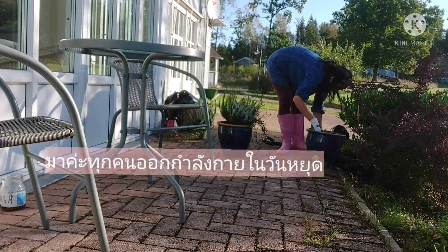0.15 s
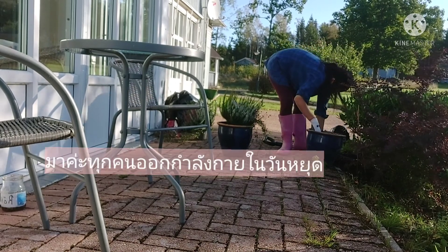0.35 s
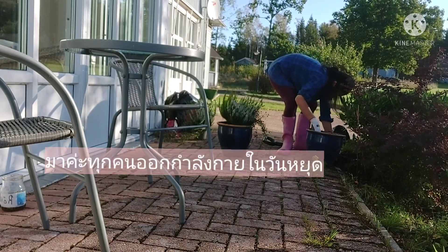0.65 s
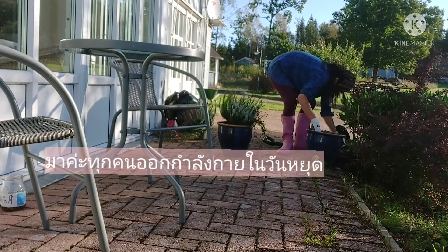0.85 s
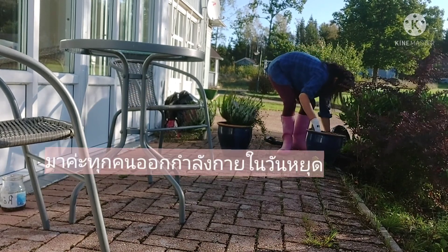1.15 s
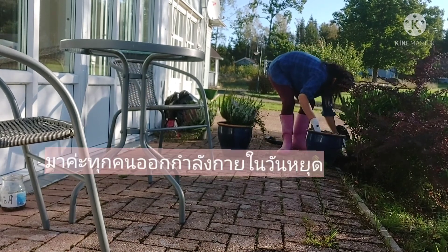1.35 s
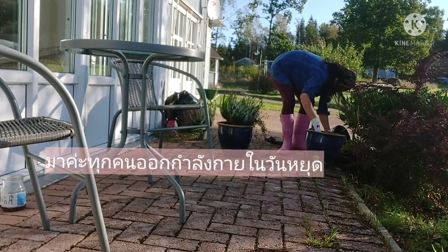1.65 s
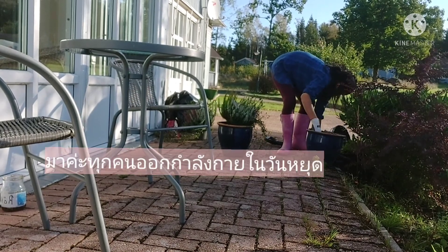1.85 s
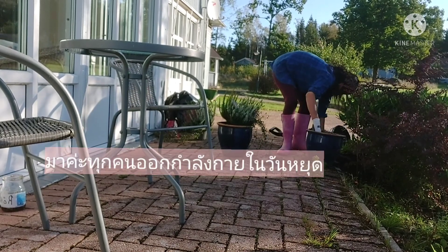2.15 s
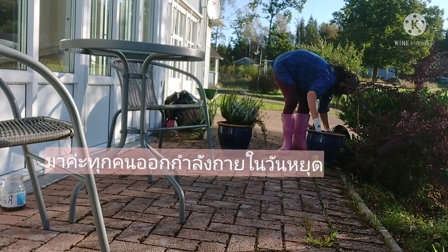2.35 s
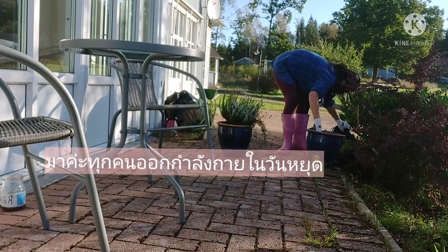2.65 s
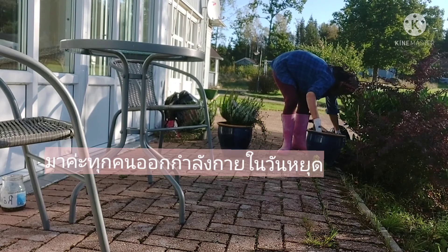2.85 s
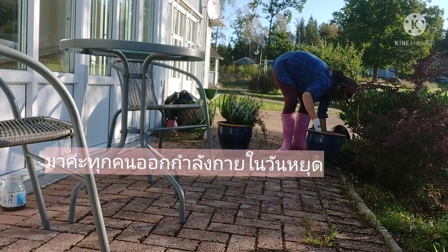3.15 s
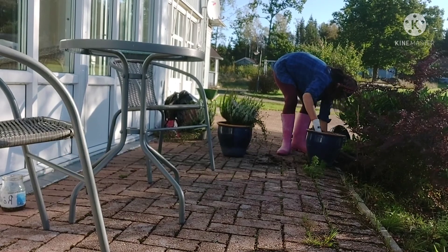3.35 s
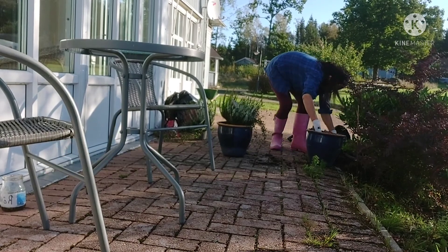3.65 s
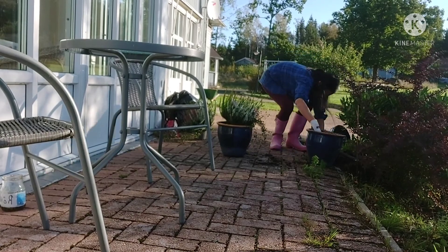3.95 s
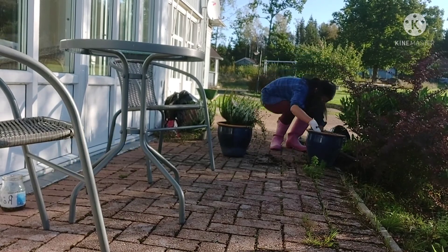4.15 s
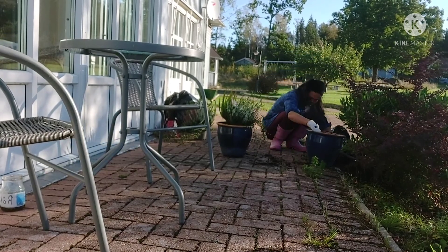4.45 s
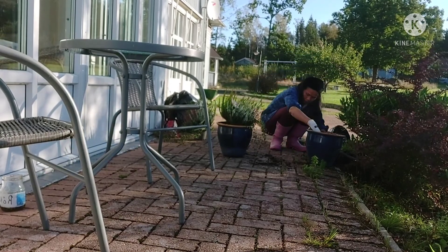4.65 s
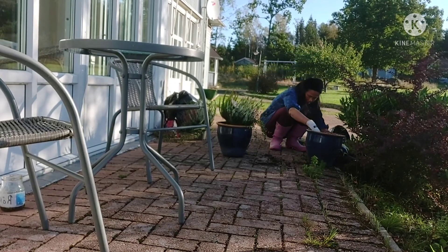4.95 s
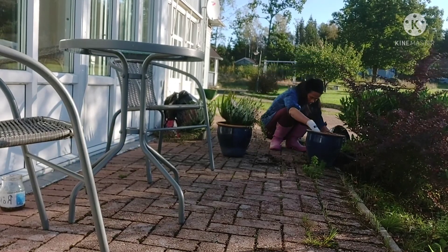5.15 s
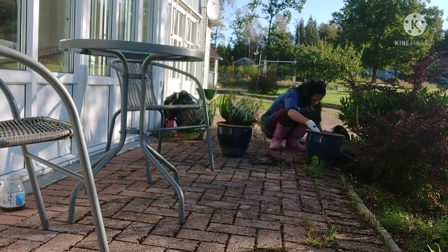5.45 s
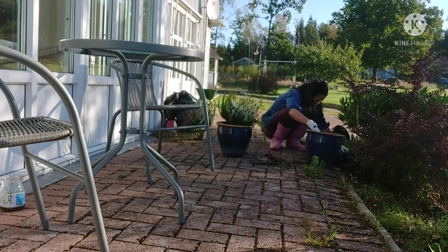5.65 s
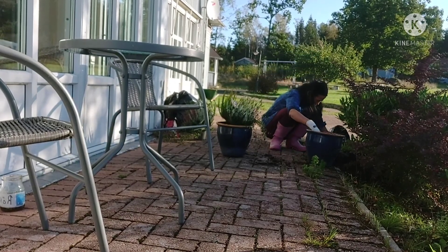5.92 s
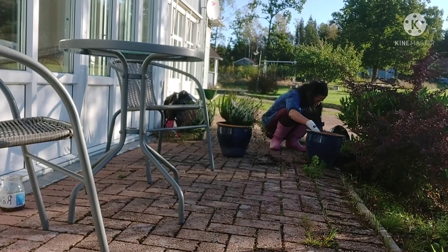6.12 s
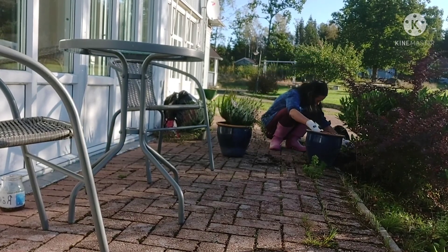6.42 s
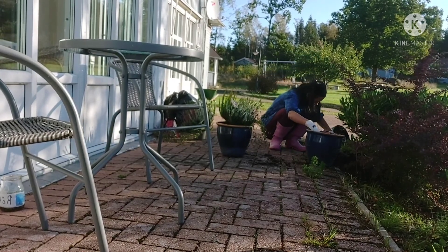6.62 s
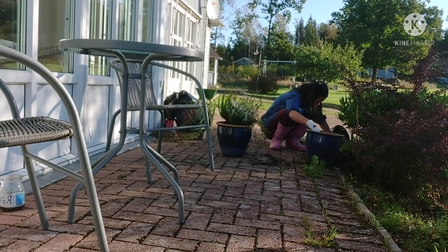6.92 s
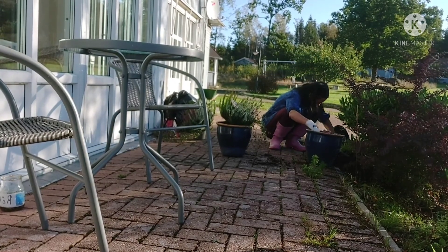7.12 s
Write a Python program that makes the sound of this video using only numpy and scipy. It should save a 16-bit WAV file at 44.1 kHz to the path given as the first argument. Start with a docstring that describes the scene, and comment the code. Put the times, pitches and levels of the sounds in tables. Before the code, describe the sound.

Outdoors on a brick patio beside a house wall, wind rumbles close on a stereo microphone, over a low breeze murmur and very faint hiss. At about 0.4-0.8 s a trowel a few metres away bites, pushes and lifts through gritty soil, bright and scratchy. Faint boot scuffs come near 0.3 and 1.0 s. The wind surges from 1.2 to 1.9 s with heavy, fluttering thumps, strongest around 1.4; a sharp clack with a brief metallic ring lands at 1.8. Light soil touches follow, another scuff and gust near 3.0, and a hollow, duller pot knock at 3.15. The wind calms after 4 s, leaving short crisp scoops at 4.15, 4.75 with a knock, 5.5, and 6.15 with a harder clack. Wind returns mildly around 6-6.4. Small quick clicks and knocks at 6.85-7.15 close it.

```python
"""A hand trowel scrapes through gritty soil in short strokes and knocks on a large pot, a few metres from the
microphone on a brick patio. Scrapes are random grain clicks under pressure curves, coloured by the blade;
knocks add cracks and decaying sines for blade and pot. Boots scuff sparsely, a dull crackle sounds once, and
the house wall throws the sound back as decaying noise. Close on the two microphone ports, wind rumbles as
banded noise and thumps as push-pull pulses, over a breeze murmur and a faint outdoor hiss."""
import sys
import numpy as np
from scipy import signal
from scipy.io import wavfile

SR = 44100
rng = np.random.default_rng(int(sys.argv[2]) if len(sys.argv) > 2 else 0)


def unload_wav(signal):
    """Save mono or channel-first audio to the path in sys.argv[1] as 16-bit WAV at rate SR, clipped to [-1, 1]."""
    wavfile.write(
        sys.argv[1],
        SR,
        np.round(np.clip(np.atleast_2d(signal).T, -1, 1) * 32767).astype(np.int16),
    )


N = 321048

# Table levels are relative: each source trims or shapes them further.
# Scoops, in which the blade bites, slides in, is pushed and lifts out: (bite time [s], bite level [dB],
# push time [s], push swell [s], push hold [s], push scrape [dB], push grit [dB], lift time [s], lift level [dB])
SCOOP_STROKES = [(0.441, -39.5, 0.5385, 0.015, 0.097, -45, -36.5, 0.708, -48.5),
                 (4.135, -43.5, 4.199, 0.021, 0.048, -38.5, -34.5, 4.330, -62),
                 (4.753, -51, 4.766, 0.017, 0.0062, -47.5, -39, 4.872, -61),
                 (5.452, -44.5, 5.512, 0.015, 0.033, -37, -37, 5.670, -47),
                 (6.133, -52.5, 6.187, 0.0045, 0.046, -44.5, -38.5, 6.323, -52)]
# Light touches of blade and hand on the soil: (time [s], hold [s], scrape level [dB], grit level [dB])
LIGHT_TOUCHES = [(0.286, 0.044, -90, -61), (0.475, 0.0074, -56, -50), (0.982, .11, -61, -64),
                 (1.443, 0.047, -90, -63.5), (1.966, .018, -67.5, -75), (2.201, 0.074, -73, -67.5),
                 (2.452, .038, -78, -68.5), (2.785, 0.029, -75.5, -56.5), (3.274, 0.015, -71, -63.5),
                 (3.635, 0.036, -71.5, -63), (4.393, .004, -65, -65.5), (4.883, 0.054, -66, -62.5),
                 (5.474, 0.017, -51.5, -52.5), (5.634, .024, -67, -57.5), (6.16, 0.015, -50, -47.5),
                 (7.002, 0.013, -47.5, -61)]
# Broad colour of a scrape: (frequency [Hz], density [dB per Hz])
SCRAPE_SPECTRUM = [(250, -27), (500, -3), (800, -5), (1200, -7), (1700, -7), (2800, -0.5), (4500, -1),
                   (6000, -0.5), (9000, -5.5), (12000, -2.5), (16000, -15)]
# Resonances of the blade in the soil: (frequency [Hz], width [Hz], lift [dB])
BLADE_IN_SOIL = [(1030, 52, 4), (1328, 27, 6), (2067, 95, 7.5), (2300, 37, 11.5), (3180, 170, 3.5),
                 (4160, 250, 7), (5230, 36, 1), (6500, 250, 3), (11420, 220, 7), (12900, 109, 11)]
# Hollow sound of the pot around the blade, stronger as the blade works deeper: (time [s], level [dB])
POT_HOLLOW = [(0, 1.5), (0.8, -5.5), (1.7, -5), (3.2, 12), (4.1, -3.5), (4.8, -1.5), (5.4, -2.5),
              (6.3, 3.5), (7.28, 1)]
# Knocks of trowel and pot: (time [s], clack [dB], grit [dB], blade ring [dB], pot ring [dB])
POT_KNOCKS = [(1.793, -28, -33, -45, -61), (3.147, -37.5, -38, -69, -40.5), (4.791, -35.5, -36, -75, -58),
              (6.226, -31, -41, -63, -66), (6.853, -44, -47.5, -58, -79), (6.880, -38.5, -41, -44.5, -74),
              (6.998, -46, -57.5, -55, -61), (7.061, -54, -89, -64, -80), (7.140, -68, -57.5, -64, -103)]
# Small blows within a scoop: (clack [dB], grit [dB], blade ring [dB], pot ring [dB])
BITE_BLOW = (-8, 0, -18, -35)   # against the bite level
PUSH_BLOW = (-11, 3.5, -24, -17)   # against the push scrape
LIFT_BLOW = (-9.5, 2, -16, -27)   # against the lift level
# Ringing modes of the blade: (frequency [Hz], level [dB], time to fall 60 dB [s])
BLADE_MODES = [(1206, -21.5, 0.55), (1320, -12, .19), (1820, -17, 0.13), (2020, -12, 0.13),
               (2220, -5.5, 0.26), (2280, -19, 0.45), (2780, -12, 0.16), (3190, -17, 0.15),
               (4270, -10, 0.14), (6800, -16, 0.096)]
# Ringing modes of the pot: (frequency [Hz], level [dB], time to fall 60 dB [s])
POT_MODES = [(476, 1, 0.18), (686, 6.5, 0.058), (770, -10, 0.42), (1030, -8.5, 0.35), (1125, -10, 0.26),
             (1385, -13, 0.14), (1712, -11.5, .14), (1835, -11.5, .12), (3320, -31, .1), (4550, -14, .05)]
# Loose soil rattling in the pot: (frequency [Hz], density [dB per Hz])
RATTLE_SPECTRUM = [(400, 6.5), (800, 0.5), (1200, -13), (1700, -3.5), (3000, -11.5), (7000, -16)]
# Dull rubs: boots shifting on the bricks, and a rough crackle near 2.95 s: (time [s], swell [s], hold [s],
# level [dB])
DULL_SCUFFS = [(0.292, 0.0039, 0.031, -58.5), (0.981, 0.0061, 0.084, -54.5), (2.951, 0.0027, 0.026, -57.5),
               (3.619, 0.0091, 0.027, -66.5)]
# Colour of the scuffs: (frequency [Hz], density [dB per Hz])
SCUFF_SPECTRUM = [(300, 4.5), (700, 5), (1300, 4.5), (2100, -8.5), (3000, -26), (6000, -21)]
# Gusts on the ports: (start time [s], hold [s], strength [dB], extra flutter [dB])
PORT_GUSTS = [(0.261, 0.091, -31.5, -3), (0.441, 0.18, -32.5, -1.5), (0.705, 0.025, -33.5, 8.5),
              (0.841, 0.046, -33, 0), (0.985, 0.11, -32.5, 0.5), (1.224, .32, -27, -1),
              (1.639, 0.035, -30.5, 0), (1.694, .02, -23, 2), (1.835, 0.027, -25.5, 0.5),
              (2.005, 0.29, -35.5, 2), (2.255, .22, -35.5, -3), (2.689, 0.11, -36.5, -4),
              (2.82, 0.083, -33, 8.5), (2.935, 0.055, -31, 9), (3.043, 0.14, -34.5, 7.5),
              (3.261, 0.062, -36, 1.5), (3.595, 0.075, -35, 2.5), (3.772, .12, -36.5, 8.5),
              (3.906, 0.015, -34, -3), (4.016, .15, -39.5, 1.5), (4.195, 0.07, -39, 9.5),
              (4.774, 0.13, -43, -1.5), (4.994, 0.233, -42.5, -0.5), (5.487, 0.13, -52.5, -0.5),
              (5.924, 0.066, -36.5, 3), (6.113, 0.17, -33.5, 2), (6.343, 0.041, -34, 2.5),
              (6.636, 0.14, -44, -4), (6.859, 0.12, -38, -0.5), (7.184, 0.039, -36, -5)]
# Light wind that keeps blowing between the gusts: (time [s], level [dB])
WIND_BETWEEN_GUSTS = [(0.0, -51), (0.38, -39.5), (1.12, -43), (1.48, -32.5), (2.64, -49.5), (2.96, -32.5),
                      (3.53, -52.5), (3.73, -47), (5.8, -61.5), (6.22, -42.5), (6.41, -56), (7.28, -49.5)]
# Wind colour at the ports: (frequency [Hz], density [dB per Hz])
WIND_SPECTRUM = [(25, -19), (45, -4.5), (75, 3), (140, -2.5), (220, -7.5), (330, -3.5), (480, -24.5),
                 (680, -33.5), (950, -47)]
# Hardest single eddies: (time [s], peak level [dB], pitch [Hz], left over right [dB])
WIND_BUFFETS = [(0.551, -18, 129, -1.5), (1.301, -14.5, 203, -1.5), (1.363, -13, 156, -4.5),
                (1.421, -11, 133, 3), (1.430, -21, 252, -11.5), (1.454, -17, 138, 7),
                (1.483, -22.5, 247, -9), (1.720, -15.5, 162, 6), (1.756, -19.5, 75, -3),
                (1.881, -21, 129, 0), (2.975, -20.5, 340, -6.5), (3.099, -27.5, 218, 1),
                (4.281, -33, 128, 8), (5.155, -26.5, 94, 5), (5.965, -33.5, 127, 4),
                (6.381, -19.5, 238, -1.5)]
# Murmur of the breeze: (frequency [Hz], density [dB per Hz])
BREEZE_SPECTRUM = [(25, -10), (55, 5), (95, 6), (170, -24.5)]
# Rise and fall of the outdoor hiss: (time [s], level [dB])
HISS_CURVE = [(0, -72), (0.4, -66), (0.9, -68), (1.4, -64.5), (2.0, -68), (2.5, -69), (3.1, -68),
              (3.5, -69.5), (3.9, -66.5), (4.6, -73.5), (5.3, -74), (6.0, -72.5), (6.6, -73.5), (7.28, -71)]
# Colour of the outdoor hiss: (frequency [Hz], density [dB per Hz])
HISS_SPECTRUM = [(100, 20.5), (400, 12), (800, 5.5), (1600, 2.5), (3000, -1.5), (6000, -1), (9000, -1),
                 (12000, 2.5), (16000, -4.5)]

BITE_SWELL_S, BITE_HOLD_S = 0.0022, 0.007
LIFT_SWELL_S, LIFT_HOLD_S = 0.0014, 0.017
TOUCH_SWELL_S = 0.0051
SLIDE_SCRAPE_DB, SLIDE_GRIT_DB = -18.5, -25   # sliding in builds up to this, against the push
LIGHT_SCRAPE_DB = -9   # bite and lift are mostly grit: their scrape against their grit
GUST_SWELL_S, GUST_T60_S = 0.024, 0.14   # every gust builds and dies away alike
# Flutter gains on the rumble by this many dB per dB of wind above a stiff breeze
STIFF_WIND_DB, FLUTTER_GROWTH = -34.5, 0.48
PORT_LAG_S = .00009   # direct sound reaches the left port this much later
CUTOFF_HZ = 15700


def digging(stop_t60=0.076, judder_db=1.5, judder_hz=70, count=3):
    """The blade judders through the soil, scraping at several spots, each with its own paths to the ports."""
    moves = []   # (pressure curve, scrape dB, grit dB)
    for s, hold, scrape_db, grit_db in LIGHT_TOUCHES:
        moves.append((stroke(s, TOUCH_SWELL_S, hold, stop_t60), scrape_db, grit_db))
    for bite_s, bite_db, push_s, swell, hold, scrape_db, grit_db, lift_s, lift_db in SCOOP_STROKES:
        bite = stroke(bite_s, BITE_SWELL_S, BITE_HOLD_S, stop_t60)
        slide = stroke(bite_s, push_s - bite_s, 0, stop_t60)
        push = stroke(push_s, swell, hold, stop_t60)
        lift = stroke(lift_s, LIFT_SWELL_S, LIFT_HOLD_S, stop_t60)
        moves += [(bite, bite_db + LIGHT_SCRAPE_DB, bite_db),
                  (slide, scrape_db + SLIDE_SCRAPE_DB, grit_db + SLIDE_GRIT_DB),
                  (push, scrape_db, grit_db),
                  (lift, lift_db + LIGHT_SCRAPE_DB, lift_db)]
    scrape = sum(pressure * from_db(db) for pressure, db, _ in moves)
    grit = sum(pressure * from_db(db) for pressure, _, db in moves)
    judder = from_db(judder_db * drift(judder_hz)) * crumbs()
    spots = [patio(friction(scrape * judder, grit * judder, per_s=1500)) for _ in range(count)]
    return sum(spots) / np.sqrt(count)


def friction(scrape, grit, per_s, split_hz=2800, hollow_hz=1650, scrape_db=2.0, grit_db=0.0,
             shift_db=4.0, shift_hz=14):
    """Grains under the blade: pressure sets the middle range, sharp grit the treble; blade and pot colour both."""
    centres, layers = bands(grains(per_s, spread_db=2.5), SCRAPE_SPECTRUM)
    # the colour shifts as coarser and finer crumbs pass the edge
    layers = [band * from_db(shift_db * drift(shift_hz)) for band in layers]
    hollow = from_db(in_time(POT_HOLLOW)[0])
    layers = [band * hollow if hz < hollow_hz else band for hz, band in zip(centres, layers)]
    treble_shares = [1 / (1 + (split_hz / hz) ** 6) for hz in centres]
    middle = rms_one(sum((1 - share) * band for share, band in zip(treble_shares, layers)))
    treble = rms_one(sum(share * band for share, band in zip(treble_shares, layers)))
    rubbed = from_db(scrape_db) * scrape * middle + from_db(grit_db) * grit * treble
    return from_db(-5.0) * resonate(rubbed, BLADE_IN_SOIL)


def stroke(s, swell, hold, stop_t60):
    """Pressure of one rubbing movement: it swells, holds and dies away."""
    t = np.arange(N) / SR - s
    fall = np.clip((t - swell - hold) / stop_t60, 0, 2)
    return np.clip(t / swell, 0, 1) * from_db(-60 * fall)


def crumbs(per_s=70, size=0.91, t60=0.013):
    """Now and then a clod breaks under the blade: a jump in friction that fades at once."""
    breaks = (rng.random(N) < per_s / SR) * np.minimum(rng.exponential(size, N), 3)
    decay = from_db(-60 / (t60 * SR))
    return rms_one(1 + signal.lfilter([1], [1, -decay], breaks + 1e-18))


def grains(per_s, spread_db):
    """Soil grains slipping and cracking: random clicks of uneven size."""
    sizes = from_db(spread_db * np.minimum(rng.exponential(1, (2, N)), 4))
    return sizes * rng.standard_normal((2, N)) * (rng.random((2, N)) < per_s / SR)


def resonate(x, peaks):
    """Lift a narrow band at each resonance."""
    for hz, width_hz, db in peaks:
        b, a = signal.iirpeak(hz, hz / width_hz, fs=SR)
        x = x + (from_db(db) - 1) * signal.lfilter(b, a, x)
    return x


def knocking(clack_t60=0.084, crack_t60=0.0083, crack=0.58, rattle_db=-10.0, rattle_t60=0.44):
    """A knock is a sharp crack and a gritty clack; blade and pot ring on, and loose soil rattles in the pot."""
    hits = blows()
    clack, grit, rattle = 0, 0, 0
    for s, clack_db, grit_db, _, pot_db in hits:
        blow = stroke(s, 1 / SR, 0, clack_t60) + crack * stroke(s, 1 / SR, 0, crack_t60)
        clack = clack + blow * from_db(clack_db)
        grit = grit + blow * from_db(grit_db)
        rattle = rattle + stroke(s, 1 / SR, 0, rattle_t60) * from_db(pot_db + rattle_db)
    out = friction(clack, grit, per_s=12000) * from_db(-2.5)
    out += rattle * sum(bands(grains(per_s=2500, spread_db=-3.0), RATTLE_SPECTRUM)[1])
    times, _, _, blade_db, pot_db = np.transpose(hits)
    for modes, blow_db in ((BLADE_MODES, blade_db), (POT_MODES, pot_db)):
        for hz, db, t60 in modes:
            clicks = np.zeros(N)
            # each blow excites each mode a little unevenly
            uneven_db = rng.normal(0, 0.45, len(times))
            clicks[(times * SR).astype(int)] = from_db(blow_db + db + uneven_db)
            out += ring(clicks, hz, t60)
    return out


def blows():
    """All blows on the blade: the knocks, and the small ones that start each bite, push and lift."""
    bites = [(s, *np.add(db, BITE_BLOW)) for s, db, *_ in SCOOP_STROKES]
    jolts = [(s, *np.add(db, PUSH_BLOW)) for _, _, s, _, _, db, *_ in SCOOP_STROKES]
    lifts = [(s, *np.add(db, LIFT_BLOW)) for *_, s, db in SCOOP_STROKES]
    return list(POT_KNOCKS) + bites + jolts + lifts


def ring(clicks, hz, t60):
    """A unit click sets a decaying sine ringing from height 1."""
    r, w = from_db(-60 / (t60 * SR)), 2 * np.pi * hz / SR
    return signal.lfilter([0, np.sin(w)], [1, -2 * r * np.cos(w), r * r], clicks + 1e-18)


def scuffing(stop_t60=0.086, level_db=-1.0):
    """Sparse, dull grains: rubber soles crush sand on the bricks, and once a rough crackle sounds."""
    push = sum(from_db(db) * stroke(s, swell, hold, stop_t60) for s, swell, hold, db in DULL_SCUFFS)
    sand = sum(bands(grains(per_s=960, spread_db=3.0), SCUFF_SPECTRUM)[1])
    return from_db(level_db) * push * sand


def patio(x, near_db=1.0, near_t60=.034, far_db=-18, far_t60=.4, far_cut_hz=11000):
    """Direct sound reaches the right port first; bricks and wall scatter it at once, the garden a little longer."""
    t = np.arange(SR // 2) / SR
    near, far = rng.standard_normal((2, 2, len(t))) * (t > .0004)
    near = near * from_db(-60 * t / near_t60)
    dull = signal.butter(1, far_cut_hz, fs=SR, output="sos")
    far = signal.sosfilt(dull, far) * from_db(-60 * t / far_t60)
    echoes = (from_db(near_db) * rms_one(near) + from_db(far_db) * rms_one(far)) / np.sqrt(len(t))
    left = np.interp(np.arange(N) - PORT_LAG_S * SR, np.arange(N), x)
    return np.array([left, x]) + signal.fftconvolve(x[None], echoes, axes=1)[:, :N]


def wind(lump_db=2.5, lump_hz=40, rumble_db=1.5, flutter_db=-4.0, large_hz=150, small_hz=320,
         shared=0.23, edge_hz=680):
    """Each port has its own lumpy turbulence; in stronger gusts the small eddies gain on the large ones."""
    rumble, flutter = wind_strength()
    lumps = np.array([drift(lump_hz), drift(lump_hz)])
    air = rng.standard_normal((2, 2, N)) + shared * rng.standard_normal((2, 1, N))
    out = 0
    for hz, band in zip(*bands(air, WIND_SPECTRUM)):
        # share of small eddies: 0 at large_hz, 1 at small_hz
        small = np.clip(np.log(hz / large_hz) / np.log(small_hz / large_hz), 0, 1)
        # small eddies come in sharper bursts
        bursts = rms_one(from_db(lump_db * (1.5 + 0.7 * small) * lumps))
        strength_db = (1 - small) * (rumble + rumble_db) + small * (flutter + flutter_db)
        out = out + band * bursts * from_db(strength_db)
    return signal.sosfilt(signal.butter(6, edge_hz, fs=SR, output="sos"), out)


def wind_strength(steady_db=2.5, waver_db=0.5, waver_hz=9):
    """Gusts ride on the steady wind and waver; flutter grows faster than rumble: (rumble dB, flutter dB)."""
    power = from_db(in_time(WIND_BETWEEN_GUSTS)[0] + steady_db) ** 2
    extra = 0   # extra flutter, weighted by the power of each gust
    for s, hold, db, flutter_db in PORT_GUSTS:
        gust = (from_db(db) * stroke(s, GUST_SWELL_S, hold, GUST_T60_S)) ** 2
        power = power + gust
        extra = extra + gust * flutter_db
    level = 10 * np.log10(power) + waver_db * drift(waver_hz)
    return level, level + FLUTTER_GROWTH * (level - STIFF_WIND_DB) + extra / power


def buffets(crossing_s=0.00079):
    """An eddy passing a port gives one push and one pull, a moment apart in the two ports."""
    t, out = np.arange(N) / SR, np.zeros((2, N))
    lags = rng.normal(0, crossing_s, len(WIND_BUFFETS))
    for (s, db, hz, pan_db), lag in zip(WIND_BUFFETS, lags):
        near = abs(t - s) < 2 / hz
        u = 2 * np.pi * hz * (t[near] - s - np.array([[lag], [-lag]]) / 2)
        height = from_db(db + np.array([[pan_db], [-pan_db]]) / 2)
        out[:, near] -= height * u * np.exp((1 - u ** 2) / 2)
    return out


def breeze(level_db=-59):
    """Between gusts the air still murmurs on each port: steady low noise."""
    return from_db(level_db) * sum(bands(rng.standard_normal((2, 2, N)), BREEZE_SPECTRUM)[1])


def hiss(level_db=2.0, shared=0.2):
    """Smooth faint outdoor noise that slowly rises and falls, mostly unrelated in the two ports."""
    air = rng.standard_normal((2, 2, N)) + shared * rng.standard_normal((2, 1, N))
    return from_db(in_time(HISS_CURVE)[0] + level_db) * sum(bands(air, HISS_SPECTRUM)[1])


def bands(sources, colour):
    """Half-octave bands under a spectrum, neighbours from unrelated sources: (centres Hz, bands of total power 1)."""
    edges = 16000 / 2 ** np.arange(0, 10, .5)[::-1]
    centres, out = [], []
    for k, (low, high) in enumerate(zip(edges, edges[1:])):
        if high > colour[0][0] and low < colour[-1][0]:
            centre = np.sqrt(low * high)
            sos = signal.butter(3, [low, high], "band", fs=SR, output="sos")
            centres.append(centre)
            out.append(from_db(at_hz(colour, centre)) * signal.sosfilt(sos, sources[k % 2]))
    total = np.sqrt(sum(np.mean(band ** 2) for band in out))
    return centres, [band / total for band in out]


def drift(rate_hz):
    """Smooth random wander with spread 1, drawn at every 20th sample and joined by lines."""
    r = np.exp(-40 * np.pi * rate_hz / SR)
    noise = rng.standard_normal(N // 20 + 2002)
    slow = signal.lfilter([1], [1, -2 * r, r * r], noise)[2000:]   # skip the filter's start
    return np.interp(np.arange(N) / 20, np.arange(len(slow)), rms_one(slow))


def in_time(rows):
    """Each column of a curve, at every sample."""
    s, *columns = np.transpose(rows)
    return [np.interp(np.arange(N) / SR, s, column) for column in columns]


def at_hz(points, hz):
    """Read a spectrum on a log-frequency axis."""
    point_hz, point_db = np.transpose(points)
    return np.interp(np.log(hz), np.log(point_hz), point_db)


def from_db(db):
    """Decibels to gain."""
    return 10 ** (np.asarray(db) / 20)


def rms_one(x):
    """Scale to unit power."""
    return x / np.sqrt(np.mean(x ** 2) + 1e-20)


def scene(ceiling=0.49):
    """The work at the pot, heard across the patio through the wind; the hardest gusts are rounded off."""
    ports = wind() * from_db([[.4], [-.4]]) + buffets()   # wind leans slightly to the left port
    gusts = ceiling * np.tanh(ports / ceiling)
    return digging() + patio(knocking()) + patio(scuffing()) + gusts + breeze() + hiss()


def record(dry):
    """The microphone's range: the deepest bass and the top are cut."""
    dry = signal.sosfilt(signal.butter(2, 18, "high", fs=SR, output="sos"), dry)
    return signal.sosfilt(signal.ellip(10, .2, 80, CUTOFF_HZ, fs=SR, output="sos"), dry)


dry = scene()
out = record(dry)
unload_wav(out)
```